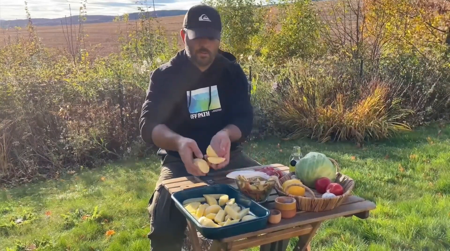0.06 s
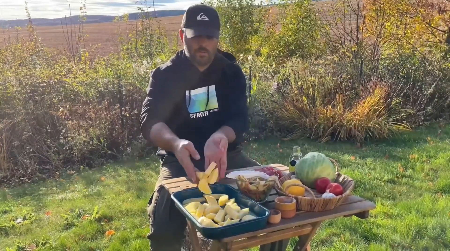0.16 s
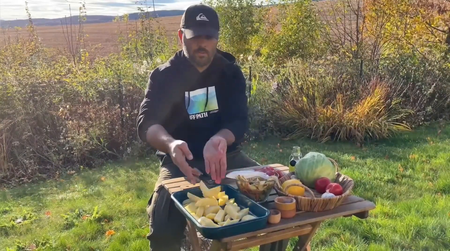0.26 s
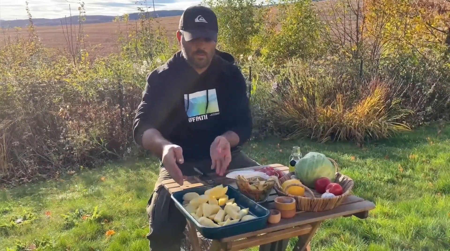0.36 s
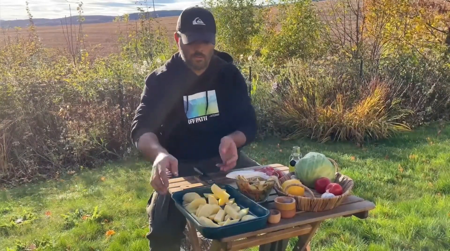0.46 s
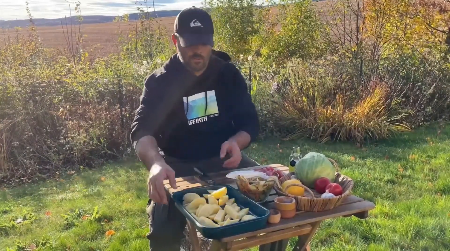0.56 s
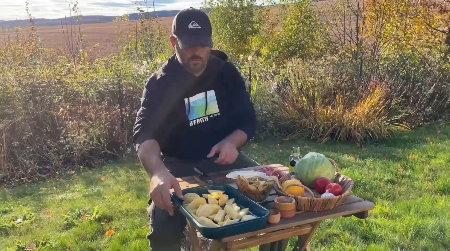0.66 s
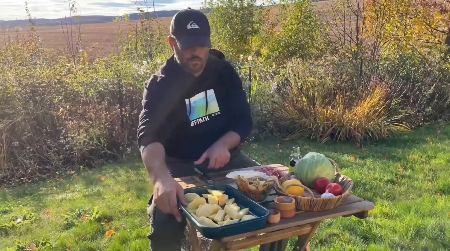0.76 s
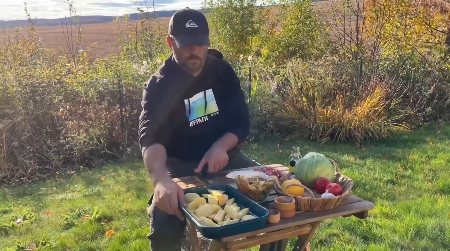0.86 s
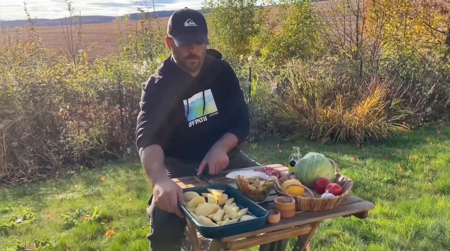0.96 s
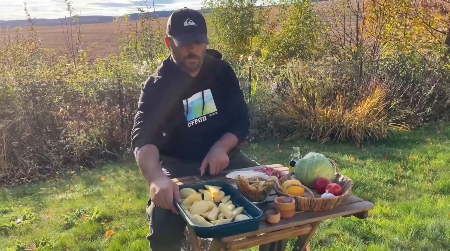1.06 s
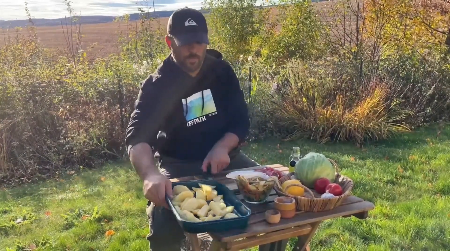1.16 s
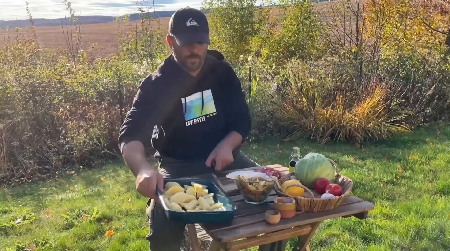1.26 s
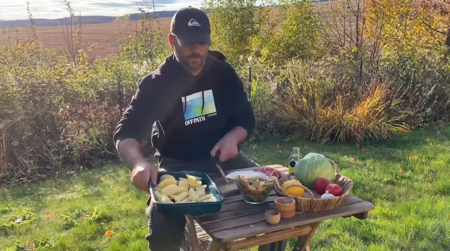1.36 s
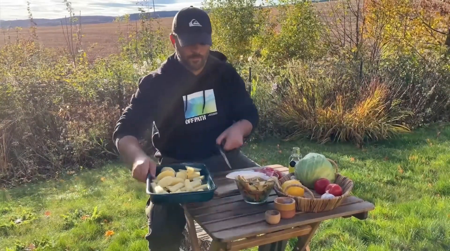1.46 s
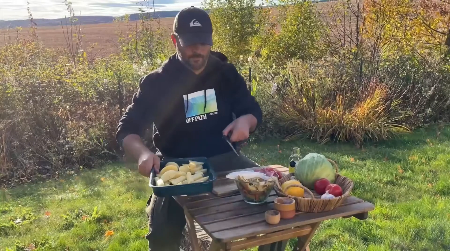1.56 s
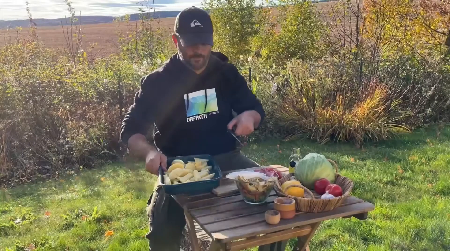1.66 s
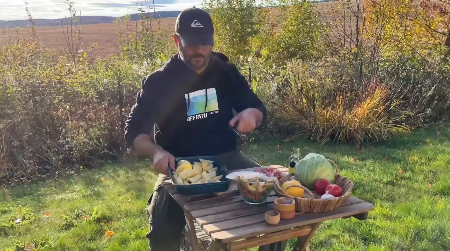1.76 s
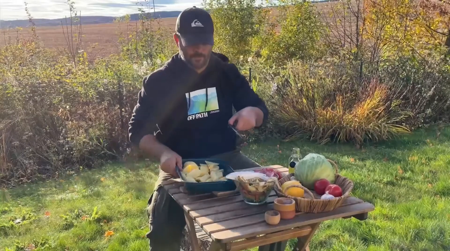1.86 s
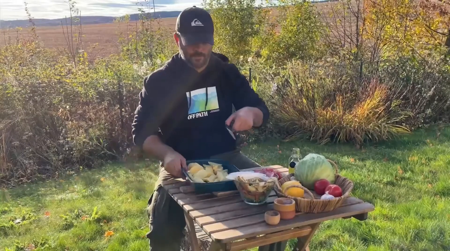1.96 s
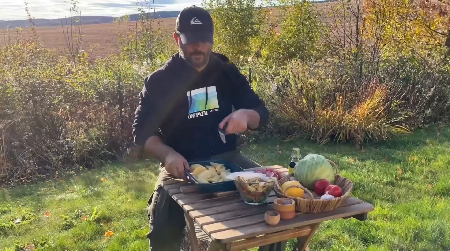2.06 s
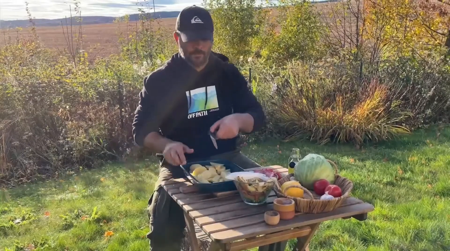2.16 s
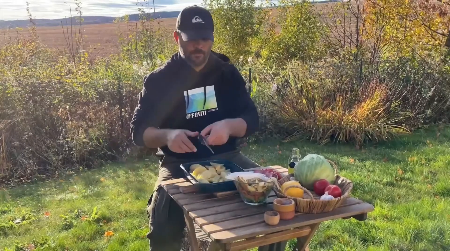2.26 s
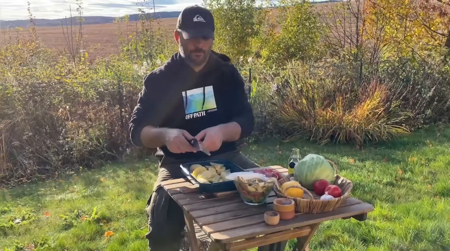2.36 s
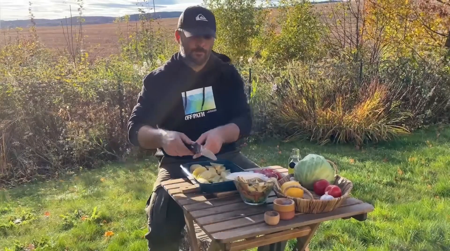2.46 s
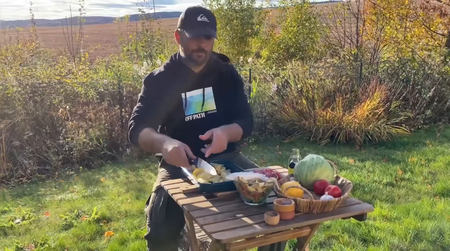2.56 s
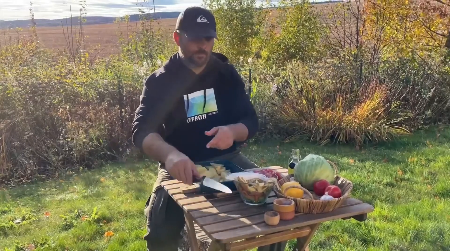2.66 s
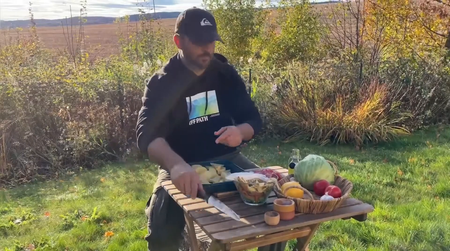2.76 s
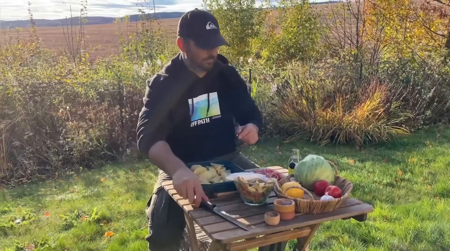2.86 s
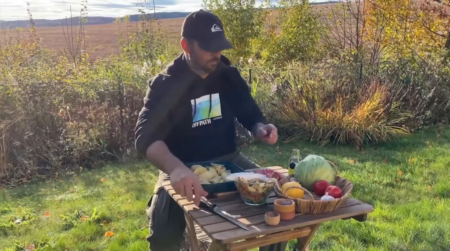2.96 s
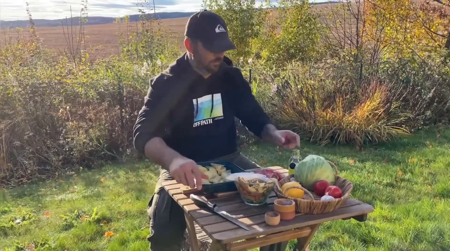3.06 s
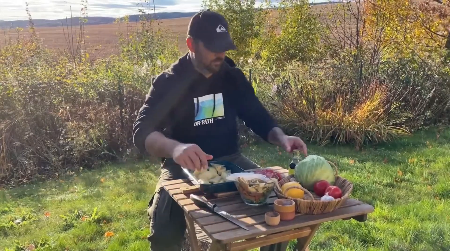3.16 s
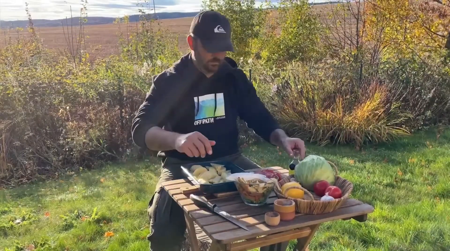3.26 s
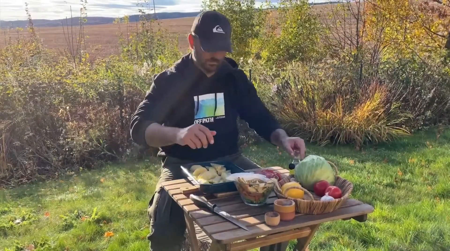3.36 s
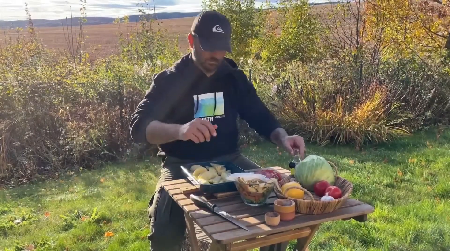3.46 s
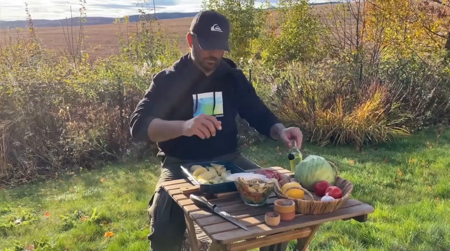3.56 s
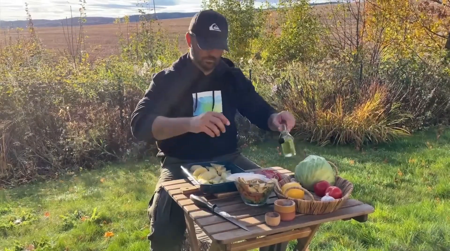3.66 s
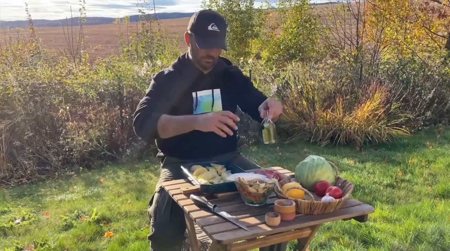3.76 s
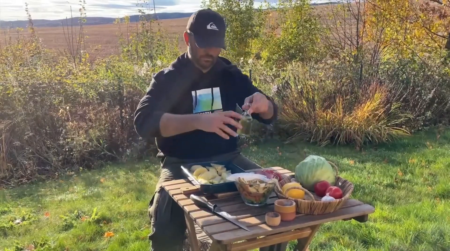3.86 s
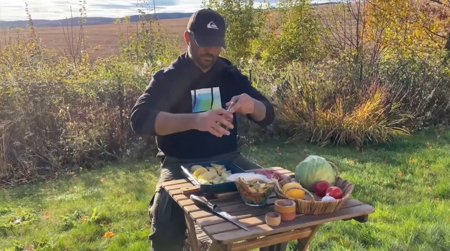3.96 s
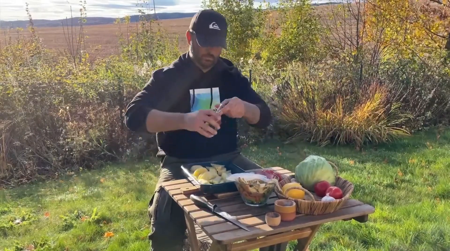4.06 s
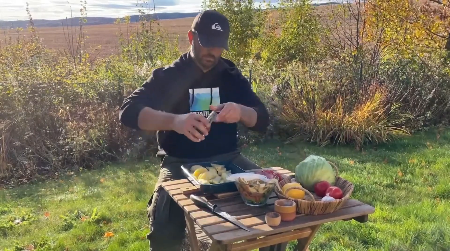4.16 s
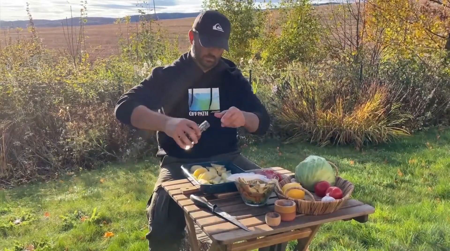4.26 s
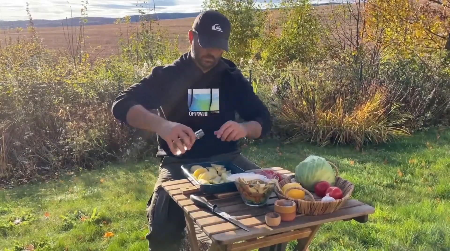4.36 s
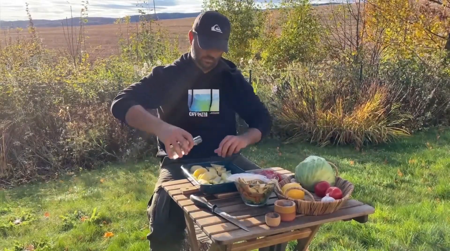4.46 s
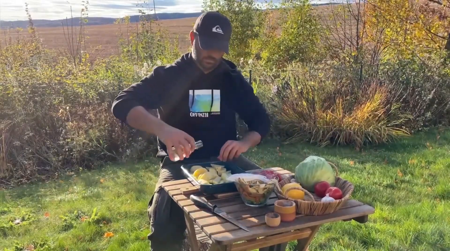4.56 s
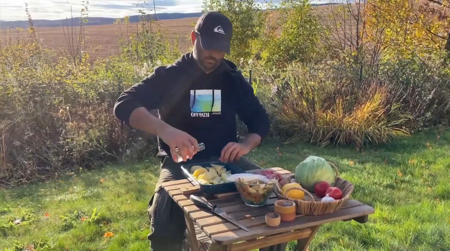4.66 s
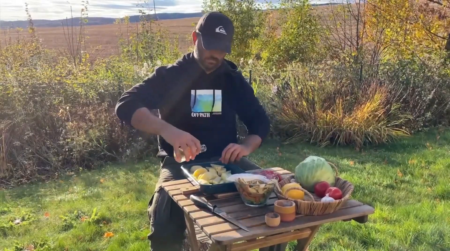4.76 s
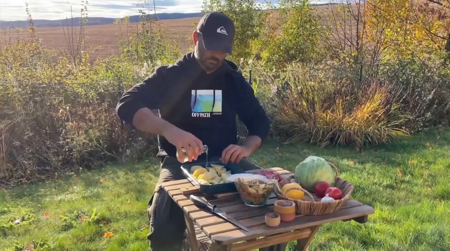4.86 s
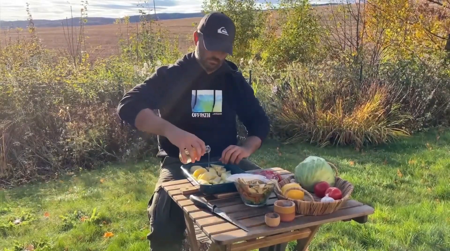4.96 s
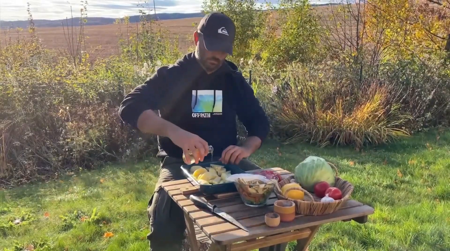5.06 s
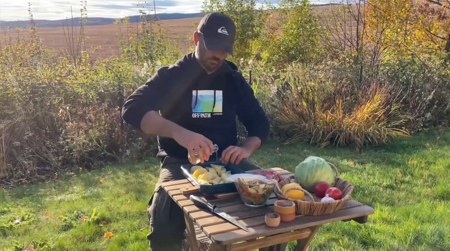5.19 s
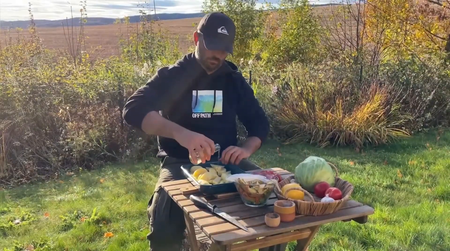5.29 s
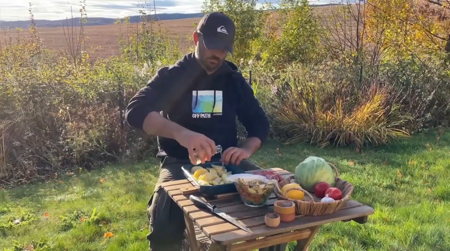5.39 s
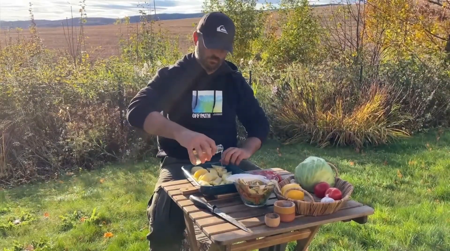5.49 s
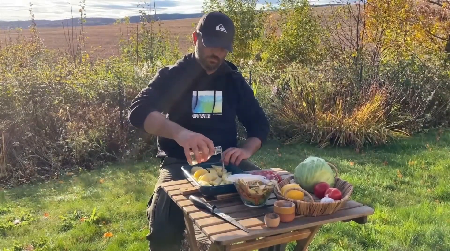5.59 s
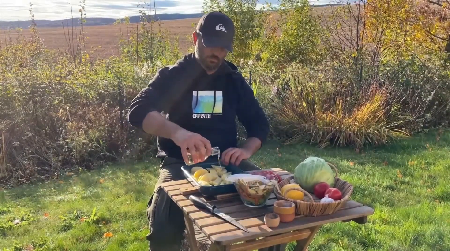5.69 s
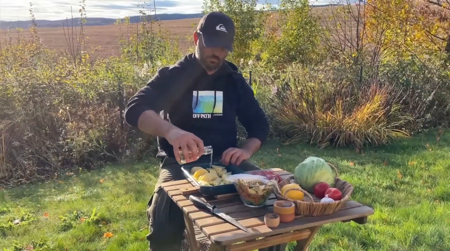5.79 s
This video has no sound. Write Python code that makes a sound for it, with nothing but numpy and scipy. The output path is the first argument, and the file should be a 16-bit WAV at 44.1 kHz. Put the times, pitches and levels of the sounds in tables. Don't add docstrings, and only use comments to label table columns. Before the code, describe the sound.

Open-air table sounds picked up by a small stereo microphone buffeted by wind. First only low flutters and a barely audible scrape with a thin squeak; then a hard metallic tray landing with duller wooden settling knocks, then a bright blade tick and solid handle knock with fading rocks. Later comes a heavy low wind burst, a nearly hidden cork pop, and a short dry run of glass taps, all above faint leaf hiss.

```python
import sys
import numpy as np
from scipy import signal
from scipy.fft import rfft, irfft, next_fast_len
from scipy.io import wavfile
from scipy.ndimage import uniform_filter1d

SR = 44100
rng = np.random.default_rng(int(sys.argv[2]) if len(sys.argv) > 2 else 0)


def decibels_to_gain(level_db):
    exponent = np.asarray(level_db, float) / 20
    return 10 ** exponent


def generate_wav(signal):
    frames = np.transpose(np.atleast_2d(signal))
    scaled = np.clip(frames, -1, 1) * 32767
    pcm = np.round(scaled).astype(np.int16)
    wavfile.write(sys.argv[1], SR, pcm)


N = 257103
T = np.arange(N) / SR
SIZE = next_fast_len(N)
HZ = np.fft.rfftfreq(SIZE, 1 / SR)

# frequency in Hz, left minus right in dB.
TABLE_BALANCE = [(700, 1), (1500, 1.5), (3000, 3), (5500, 2), (9000, 0.5)]


def column(rows, k, at):
    rows = np.array(rows, float)
    return np.interp(at, rows[:, 0], rows[:, k])


def at_hz(points, hz):
    points = np.array(points, float)
    return np.interp(np.log(hz + 0.00083), np.log(points[:, 0]), points[:, 1])


def rms_one(x):
    return x / np.sqrt(np.mean(x ** 2) + 1e-30)


def coloured(x, spectrum):
    return rms_one(irfft(rfft(x, SIZE) * decibels_to_gain(at_hz(spectrum, HZ)), SIZE)[:N])


def drift(hz):
    lowpass = signal.butter(2, hz, fs=SR, output="sos")
    return rms_one(signal.sosfilt(lowpass, rng.standard_normal(N + SR))[SR:])


def ring(contact, hz, t60):
    r, w = decibels_to_gain(-60 / (t60 * SR)), 2 * np.pi * hz / SR
    return signal.lfilter([0, np.sin(w)], [1, -2 * r * np.cos(w), r * r], contact + 1e-18)


def blows(events, modes, crack, crack_db, contact_s):
    # frequency in Hz, t60 in seconds.
    crack_t60 = [(200, 0.17), (600, 0.073), (1500, 0.085), (3000, 0.039), (6000, 0.063), (12000, 0.035)]
    out, t = np.zeros((2, N + SR)), np.arange(SR // 4) / SR
    edges = 140 * 2 ** np.arange(0, 6.6, .5)
    banks = [signal.butter(2, pair, "band", fs=SR, output="sos") for pair in zip(edges, edges[1:])]
    for s, peak_db, hard_db, lasting in events:
        contact = rng.standard_normal((2, len(t))) * np.tanh(t / 0.00009) * np.exp(-t / contact_s)
        rings, rattle = 0, 0
        for hz, level_db, t60 in modes:
            gain = decibels_to_gain(level_db + hard_db * np.log2(hz / 1000) + rng.normal(0, 0.99))
            rings = rings + gain * ring(contact, hz, t60 * lasting)
        for low, sos in zip(edges, banks):
            hz = low * 2 ** .25
            decay = decibels_to_gain(-60 * t / (at_hz(crack_t60, hz) * lasting))
            dying = np.tanh(t / 0.00066) * decay * rng.standard_normal((2, len(t)))
            gain = decibels_to_gain(at_hz(crack, hz) + hard_db * np.log2(hz / 1000))
            rattle = rattle + gain * signal.sosfilt(sos, dying)
        sound = rings / np.abs(rings).max() + decibels_to_gain(crack_db) * rattle / np.abs(rattle).max()
        at = round(s * SR)
        out[:, at:at + len(t)] += decibels_to_gain(peak_db) * sound / np.abs(sound[0]).max()
    return out[:, :N]


def baking_tray():
    # start in seconds, peak in dB, hardness in dB per octave, ring time factor.
    landing = [
        (1.735, -13.5, 3.5, 1),
        (1.739, -25.5, -1.5, 0.3),
    ]
    settling = [
        (1.833, -20, 0.55, 0.45),
        (1.841, -27.5, 0.26, 1),
        (1.854, -29.5, 1.2, 0.78),
        (1.872, -29.5, 0.82, 0.57),
        (1.991, -45.5, 0.89, .8),
    ]
    # frequency in Hz, level in dB, t60 in seconds.
    tray_modes = [(467, -40.5, 0.02), (536, 7, 0.059), (945, -22, .09), (1045, -1.5, 0.029),
                  (1545, -0.5, 0.053), (3090, -42.5, 0.071), (4450, -11, 0.011), (6065, -32.5, 0.14),
                  (8060, -60, .1)]
    settle_modes = [(406, -10, 0.053), (520, 13, 0.076), (1130, -7, 0.03), (1630, -4, 0.037),
                    (2750, 5, 0.019), (4200, -31, 0.017)]
    # frequency in Hz, density in dB per Hz.
    tray_crack = [(88, -43), (150, -12.5), (481, -6), (672, -11.5), (1600, -12), (2550, -16), (4520, -43.5),
                  (7040, -41), (8470, -66.5), (12500, -43.5), (16200, -89), (22000, -120)]
    settle_crack = [(88, -34), (150, 2.5), (378, 10), (832, 5), (1170, 5.5), (2210, -3.5), (2710, 3.5),
                    (4610, -46), (9000, -90), (11700, -104), (19800, -120)]
    clank = blows(landing, tray_modes, tray_crack, crack_db=-1.5, contact_s=0.0047)
    return clank + blows(settling, settle_modes, settle_crack, crack_db=18.0, contact_s=0.00093)


def knife_handle():
    # start in seconds, peak in dB, hardness in dB per octave, ring time factor.
    knocks = [
        (2.796, -26, -1, 0.62),
        (2.8, -10, 0.3, 0.91),
        (2.803, -18.5, -0.06, 1.13),
        (2.828, -36, 0.44, 1.8),
    ]
    rocks = [
        (2.87, -35.5, 0.3, 0.88),
        (2.908, -46.5, 0.25, 1),
        (2.938, -61, 0.3, 0.88),
        (2.965, -44.5, 0.3, 1.36),
        (2.984, -53, 0.33, 1.8),
    ]
    # frequency in Hz, level in dB, t60 in seconds.
    handle_modes = [(696, 4.5, 0.081), (1330, -38, 0.11), (1583, 3, 0.036), (1830, -9, 0.024),
                    (2040, -15, 0.11), (2140, -12, .065), (2417, 4, 0.049), (3140, 2, 0.02),
                    (3220, 10.5, 0.013), (4230, -3, 0.053), (6230, -5.5, .015), (10430, -24, .06)]
    rock_modes = [(860, 0, 0.048), (1770, -5.5, 0.027), (2420, -18, .03)]
    # frequency in Hz, density in dB per Hz.
    handle_crack = [(88, -47), (150, -20.5), (624, -6), (2790, -7), (3180, 1), (3690, -19), (4200, -17),
                    (8020, -58), (11000, -48), (12500, -82), (16200, -112), (22000, -120)]
    knock = blows(knocks, handle_modes, handle_crack, crack_db=1.0, contact_s=0.0036)
    return knock + blows(rocks, rock_modes, handle_crack, crack_db=-3.5, contact_s=0.0016)


def knife_blade():
    # start in seconds, peak in dB, hardness in dB per octave, ring time factor.
    ticks = [
        (2.7556, -20.5, 0.38, 0.64),
        (2.818, -27.5, 0.4, 0.71),
        (2.8639, -39.5, 0.4, 0.91),
    ]
    # frequency in Hz, level in dB, t60 in seconds.
    blade_modes = [(2067, -2.5, 0.16), (2740, 3, 0.059), (4300, -17, 0.018), (6300, -26, 0.017),
                   (6880, 5.5, 0.016), (7700, -27, 0.03)]
    # frequency in Hz, density in dB per Hz.
    blade_crack = [(240, -44), (400, -14), (2070, -15), (4760, -1.5), (5190, -6.5), (6930, -5), (8230, -22),
                   (10700, -4), (12500, -27), (16200, -57), (22000, -120)]
    return blows(ticks, blade_modes, blade_crack, crack_db=6.0, contact_s=0.0039)


def bottle_neck():
    # start in seconds, peak in dB, hardness in dB per octave, ring time factor.
    taps = [
        (5.343, -18, 0.17, 0.43),
        (5.346, -23.5, 0.13, 1),
        (5.353, -20, 0.091, 0.74),
        (5.359, -25.5, 0.15, 0.93),
        (5.365, -29.5, 0.067, 1.4),
    ]
    # frequency in Hz, level in dB, t60 in seconds.
    neck_modes = [(890, -23, 0.062), (944, 3.5, 0.0072), (1735, -26, 0.27), (1886, 1, 0.046),
                  (2875, -20, 0.24), (3280, -43.5, 0.046), (4250, -17, 0.12), (6000, -11, 0.047),
                  (6500, -16, 0.064), (7810, -6.5, 0.022), (10880, 0.5, 0.01)]
    # frequency in Hz, density in dB per Hz.
    neck_crack = [(180, -30.5), (300, -15.5), (923, -3), (1500, -8.5), (1890, -9.5), (2140, -14), (2930, 0),
                  (3820, -15.5), (6100, -17), (12500, -3), (16200, -57), (22000, -120)]
    return blows(taps, neck_modes, neck_crack, crack_db=-5.0, contact_s=0.0013)


def cork():
    # start in seconds, peak in dB, hardness in dB per octave, ring time factor.
    pops = [
        (4.56, -43, 0.1, 2.6),
        (4.571, -50.5, 0.11, 4),
    ]
    # frequency in Hz, level in dB, t60 in seconds.
    cork_modes = [(892, -14, 0.13), (1232, 6, 0.023), (1680, -18, .05)]
    # frequency in Hz, density in dB per Hz.
    cork_crack = [(440, -56.5), (750, -10), (1140, 8), (2020, -27), (2410, -13), (5000, -24), (6500, -46),
                  (11000, -120)]
    return blows(pops, cork_modes, cork_crack, crack_db=-3.5, contact_s=0.0025)


def drags():
    # time in seconds, level in dB.
    strokes = [
        [(0.17, -68), (0.32, -76)],
        [(0.83, -77), (0.898, -64.5), (1.1, -69.5)],
        [(1.795, -51), (1.876, -65.5), (1.95, -63)],
        [(2.76, -53), (3.0, -84)],
    ]
    # frequency in Hz, density in dB per Hz.
    drag_colour = [(350, -60), (600, -8), (825, -4), (1380, -9), (3340, -8.5), (3820, -14.5), (4360, -21.5),
                   (7000, -20.5), (9100, -55), (15400, -120)]
    level = 0
    for rows in strokes:
        to_nearest_end = np.minimum(T - rows[0][0], rows[-1][0] - T)
        level = level + decibels_to_gain(column(rows, 1, T)) * np.clip(to_nearest_end / 0.024, 0, 1)
    catches = rng.standard_normal((2, N)) * decibels_to_gain(0.9 * drift(134))
    return decibels_to_gain(5.0) * level * np.array([coloured(c, drag_colour) for c in catches])


def squeak():
    # time in seconds, pitch in Hz, level in dB.
    whistle = [
        (.87, 3350, -88),
        (.9, 3480, -67),
        (.94, 3420, -60),
        (.97, 3200, -72),
        (1.0, 2600, -65),
        (1.02, 2500, -68),
        (1.05, 2420, -72),
    ]
    phase = 2 * np.pi * np.cumsum(column(whistle, 1, T) + 40 * drift(65)) / SR
    sounding = (T > whistle[0][0]) & (T < whistle[-1][0])
    return sounding * decibels_to_gain(column(whistle, 2, T) + 3.4 * drift(42)) * np.sin(phase)


def shed():
    # start in seconds, length in seconds, peak in dB, pitch in Hz.
    flurries = [(.001, 0.056, -38.5, 419), (0.088, 0.11, -40, 359.4), (0.151, 0.051, -31, 461),
                (0.202, 0.041, -42.5, 470), (.305, .028, -33.5, 484), (0.465, 0.028, -40.5, 464),
                (0.662, 0.013, -42.5, 430), (.709, .062, -37.5, 469), (1.975, 0.066, -35, 164),
                (2.784, 0.056, -37.5, 111), (2.917, 0.04, -39.5, 127), (4.577, 0.09, -21.5, 116.2),
                (4.688, 0.045, -37, 98), (4.789, 0.076, -42.5, 78.1), (5.019, 0.052, -46, 79),
                (5.452, 0.032, -37.5, 148), (5.625, 0.1, -37, 170.6), (5.781, 0.041, -40.5, 169)]
    pause_s, spacing_cycles, uneven = .007, 1.9, 0.2026
    edge_db, spread_db = 7, 2
    pitch_spread, sag = 0.19, 0.072
    rows, chance = [], rng.normal(0, 1, (len(flurries), 8, 6))
    for (start, length, peak_db, hz), draws in zip(flurries, chance):
        s = start
        for late, strong, sharp, *shape in draws:
            along = 2 * (s - start) / length - 1
            if along > 1:
                break
            pitch = hz * np.exp(pitch_spread * sharp - sag * along)
            rows.append((s, peak_db - edge_db * along ** 2 + spread_db * strong, pitch, *shape))
            s += (pause_s + spacing_cycles / hz) * np.exp(uneven * late)
    return rows


def eddies():
    # time in seconds, peak in dB, pitch in Hz.
    bursts = [(.369, -42, 443), (.402, -42, 373), (.526, -53, 475), (.55, -42.5, 420), (.962, -52, 317),
              (1.144, -46.5, 302), (1.264, -48.5, 240), (1.285, -49, 275), (1.49, -50.5, 242),
              (1.522, -42.5, 252), (1.609, -52.5, 323), (1.902, -46, 181), (2.12, -47, 168),
              (2.205, -49, 202), (2.369, -45.5, 175), (2.405, -37, 124), (2.457, -49.5, 127),
              (2.641, -56.5, 170), (3.047, -34, 121), (3.27, -41.5, 160), (3.471, -39, 121),
              (3.512, -44, 162), (3.579, -42, 155), (3.648, -48.5, 160), (3.704, -42.5, 246),
              (3.779, -49, 260), (4.099, -44.5, 203), (5.135, -42.5, 78.6), (5.315, -39.5, 89),
              (5.533, -33.5, 225)]
    wake_db, wake_pitch, wake_lag_cycles = -8, 0.72, .8
    out, t = np.zeros((2, N + SR)), np.arange(-SR // 16, SR // 16) / SR
    lone = np.hstack([bursts, rng.normal(0, 1, (len(bursts), 3))])
    port_phase, port_side = np.array([[.15], [-.15]]), np.array([[1], [-1]])
    for s, peak_db, hz, pan, turn, size in [*lone, *shed()]:
        cycles = hz * t
        bell = 1 / np.cosh(cycles / (0.48 * decibels_to_gain(0.43 * size)))
        sagging = cycles - 0.12 * cycles * np.clip(cycles, -3, 3)
        flick = bell * np.cos(2 * np.pi * sagging + 3 * turn + port_phase)
        slow = wake_pitch * (cycles - wake_lag_cycles)
        wake = decibels_to_gain(wake_db) * np.cos(2 * np.pi * slow + 3 * size) / np.cosh(slow / 0.21)
        at = round(s * SR)
        out[:, at:at + len(t)] += decibels_to_gain(peak_db + 0.65 * pan * port_side) * (flick + wake)
    return out[:, SR // 16:SR // 16 + N]


def wind_filter(x, top):
    # time in seconds, low cut in Hz, top of the wind noise in Hz.
    filter_moves = [(0, 205, 587), (.2, 310.5, 670), (.8, 296, 658), (.95, 216, 456), (1.4, 172.7, 380),
                    (1.8, 140, 343), (1.88, 78.4, 276), (2.3, 66.8, 204.4), (3.68, 66, 237.6),
                    (3.76, 184, 336), (4.49, 130, 320), (4.55, 54, 268), (4.7, 52, 196), (5.0, 48, 148.4),
                    (5.4, 60.5, 230), (5.83, 66.4, 256)]
    hz, s, frames = signal.stft(x, SR, nperseg=2048)
    hz = hz[:, None] + 1e-3
    cut_hz = column(filter_moves, 1, s)
    gain = 1 / np.sqrt(1 + (cut_hz / hz) ** (2.6 + cut_hz / 18))
    if top:
        gain = gain / np.sqrt(1 + (hz / column(filter_moves, 2, s)) ** 5.9) / hz ** 1.06
        gain = gain / np.sqrt(np.mean(gain ** 2, axis=0))
    return signal.istft(frames * gain, SR, nperseg=2048)[1][..., :N]


def buffeting():
    # time in seconds, level in dB.
    gust = [(0, -55), (.2, -51), (.78, -66.5), (.86, -69), (1.3, -87), (1.52, -54), (1.72, -75),
            (1.93, -54), (2.02, -40), (2.1, -63.5), (2.9, -54), (3.55, -52.5), (3.8, -75.5), (4.52, -92),
            (4.57, -26.5), (4.75, -42.5), (5.2, -56), (5.83, -45.5)]
    lumps = decibels_to_gain(1.9 * drift(12) + 1.5 * drift(33))
    shared, own = rng.standard_normal(N), rng.standard_normal(N)
    pair = wind_filter(np.array([shared + 0.6 * own, shared - 0.7 * own]) * lumps, top=True)
    return decibels_to_gain(column(gust, 1, T) - 3.0) * rms_one(pair)


def ports(x, other, table, balance):
    alike = np.clip(column(table, 2, HZ), 0, 1)
    lean = decibels_to_gain(at_hz(balance, HZ) / 2)
    left = rfft(x, SIZE)
    mixed = alike * left + np.sqrt(1 - alike ** 2) * rfft(other, SIZE)
    right = mixed * np.exp(1j * column(table, 1, HZ))
    return irfft(np.array([left * lean, right / lean]), SIZE)[:, :N]


def field():
    # frequency in Hz, density in dB per Hz in each channel.
    field_colour = [(100, -14.5), (250, 1), (600, 1), (1000, 2), (1600, -7), (2300, -10.5), (4000, -11),
                    (5500, -14), (7000, -15.5), (9000, -11), (11300, -13.5), (11900, -14.5), (12300, -57)]
    # frequency in Hz, lead of the right port in radians, likeness of the ports from 0 to 1.
    field_ports = [(100, 0, .8), (350, .6, .4), (800, 3.0, .62), (1250, 3.1, .72), (1600, 3.0, .6),
                   (1900, .4, .3), (2300, 0, .85), (3500, -2.9, .55), (4500, -.3, .65), (5200, -1.4, .3),
                   (5300, 2.4, .4), (5700, 2.7, .6), (6700, .8, .45), (7400, 3.0, .9), (10000, 3.3, .9),
                   (10600, 4.5, .8), (12000, 6.2, .8)]
    one, twin = (coloured(w, field_colour) for w in rng.standard_normal((2, N)))
    return decibels_to_gain(-59 + 0.69 * drift(4.5)) * ports(one, twin, field_ports, TABLE_BALANCE)


def joint_stereo(x, low_drop_db, high_drop_db, side_drop_db, quiet_db, grain_db):
    hz, s, frames = signal.stft([x[0] + x[1], x[0] - x[1]], SR, nperseg=2048)
    hz, power = hz[:1024, None], np.abs(frames[:, :1024]) ** 2
    bands = uniform_filter1d(power.reshape(2, 128, 8, -1).mean(2), size=3, axis=1) + 1e-20
    both, apart = np.repeat(bands, 8, axis=1)
    limit_db = quiet_db + np.interp(hz, [800, 2500], [14, 0])
    quiet = (hz > 600) & (np.minimum(both, apart) < decibels_to_gain(2 * limit_db))
    busy_db = np.clip(.3 * (10 * np.log10(power[0].sum(0) + 1e-20) + 56), 0, 3)
    whim = uniform_filter1d(rng.normal(0, 2.6, bands.shape[1:]), size=2, axis=1)
    whim_db = np.repeat(whim, 8, axis=0)
    mid_drop_db = np.interp(hz, [6000, 7500], [low_drop_db, high_drop_db]) - busy_db + whim_db
    mid_hidden = both < apart * decibels_to_gain(-2 * mid_drop_db)
    side_hidden = (hz > 1500) & (apart < both * decibels_to_gain(-2 * (side_drop_db - whim_db)))
    frames[0, :1024] *= ~(quiet & mid_hidden)
    frames[1, :1024] *= ~(quiet & side_hidden)
    weak = uniform_filter1d(power, size=3, axis=1) < np.maximum(both, apart) * decibels_to_gain(-2 * grain_db)
    frames[:, :1024] *= ~(quiet & weak)
    both, apart = signal.istft(frames, SR, nperseg=2048)[1][:, :N]
    return np.array([both + apart, both - apart]) / 2


def scene():
    # frequency in Hz, lead of the right port in radians, likeness of the ports from 0 to 1.
    table_ports = [(100, 0, .98), (2000, -.2, .96), (3700, -1.2, .8), (5200, -.5, .8), (6000, .8, .8),
                   (7200, 1.8, .75), (8300, 3.1, .85), (9600, 3.3, .85), (10400, 4.2, .85),
                   (12000, 5.6, .8)]
    table = baking_tray() + knife_handle() + knife_blade() + bottle_neck() + cork()
    table += drags() + squeak()
    return ports(*table, table_ports, TABLE_BALANCE) + buffeting() + eddies() + field()


def low_pass(x):
    return signal.sosfilt(signal.butter(12, 12890, fs=SR, output="sos"), x)


def record(dry):
    top_cut = signal.cheby2(10, 60, 12500 + 600, fs=SR, output="sos")
    cut = signal.sosfilt(top_cut, wind_filter(dry, top=False))
    joined = joint_stereo(cut, low_drop_db=8, high_drop_db=3.5, side_drop_db=7, quiet_db=-92, grain_db=7)
    return low_pass(joined)


dry = scene()
out = record(dry)
generate_wav(out)
```